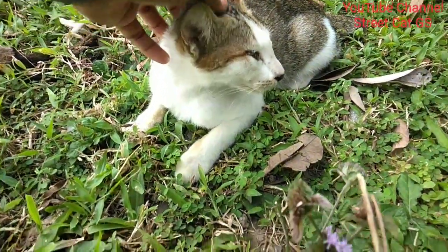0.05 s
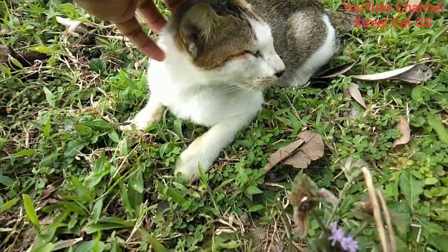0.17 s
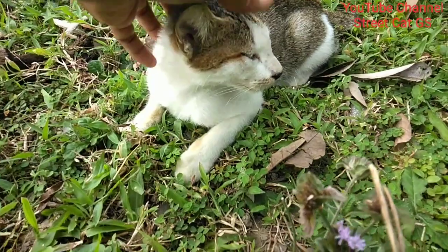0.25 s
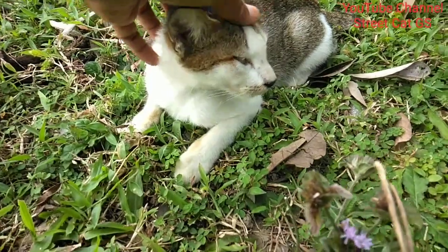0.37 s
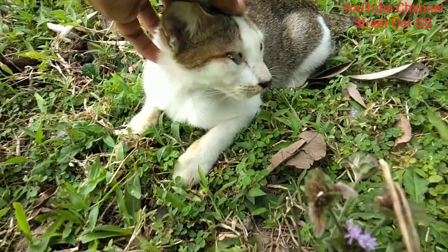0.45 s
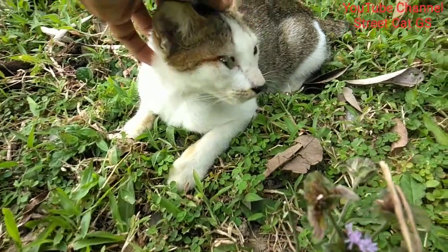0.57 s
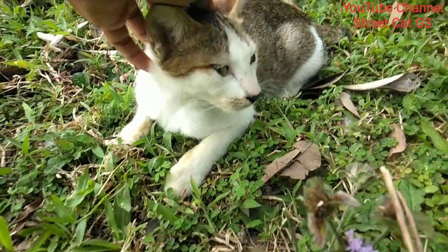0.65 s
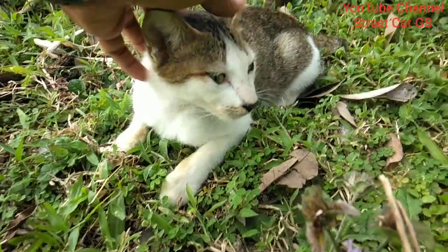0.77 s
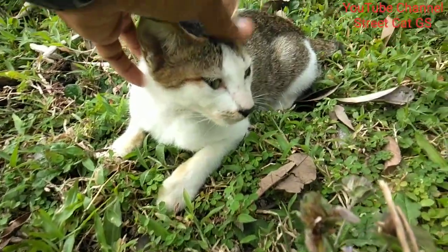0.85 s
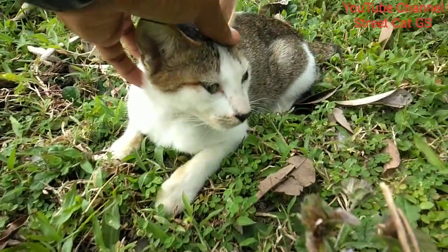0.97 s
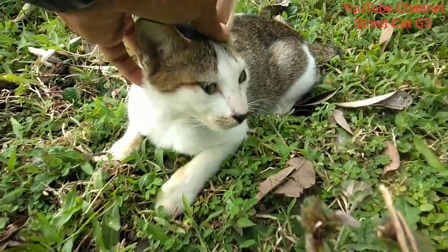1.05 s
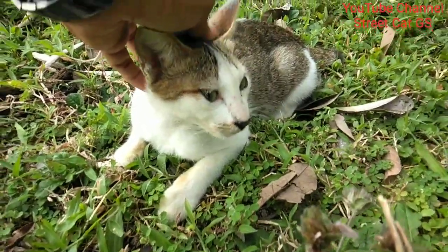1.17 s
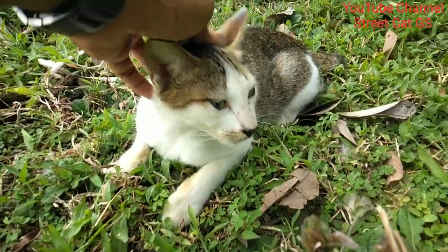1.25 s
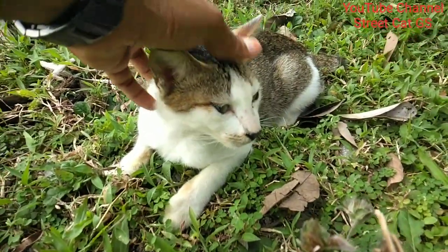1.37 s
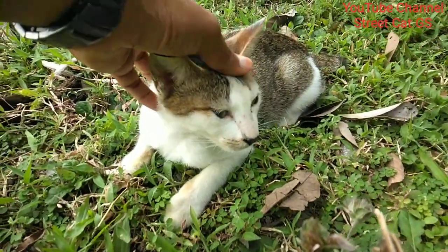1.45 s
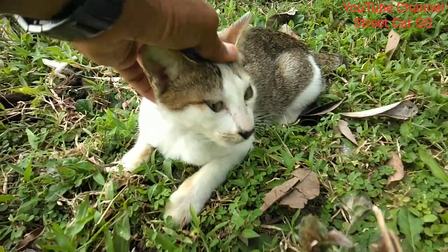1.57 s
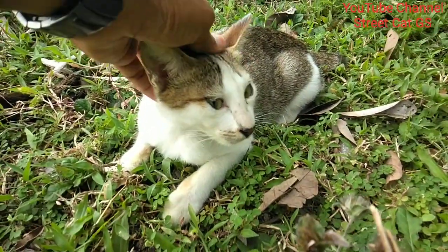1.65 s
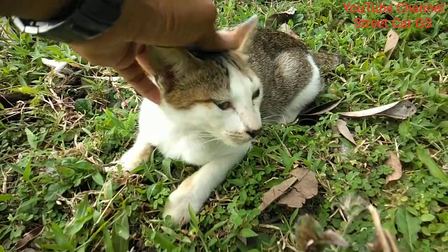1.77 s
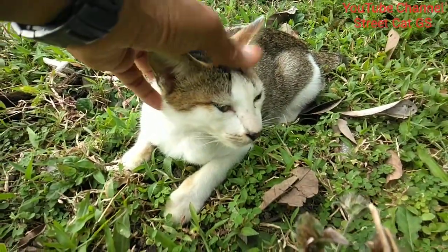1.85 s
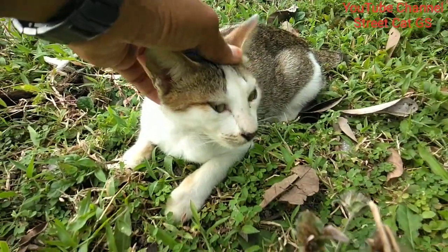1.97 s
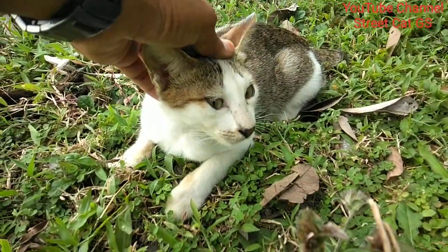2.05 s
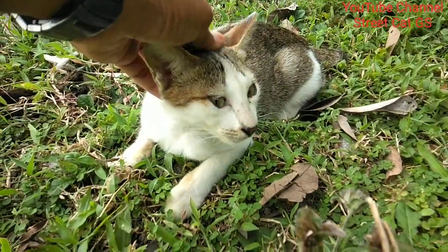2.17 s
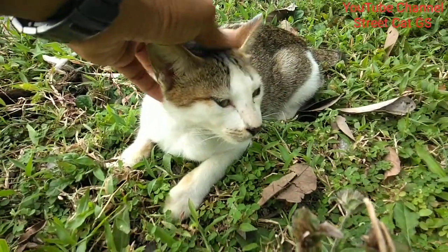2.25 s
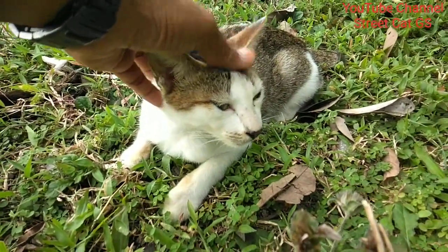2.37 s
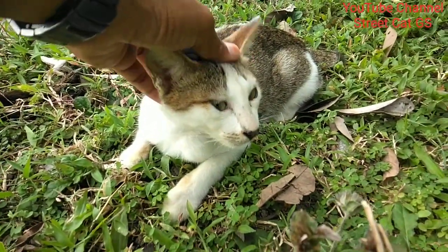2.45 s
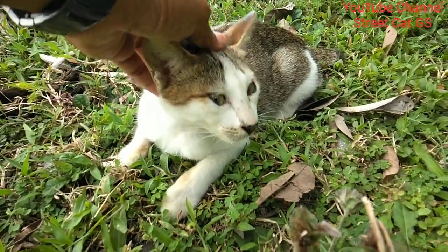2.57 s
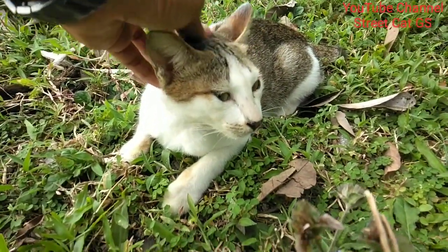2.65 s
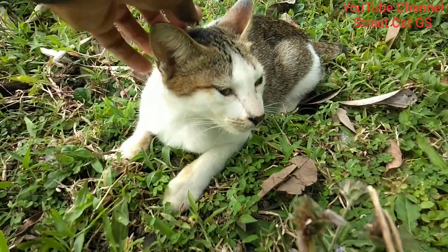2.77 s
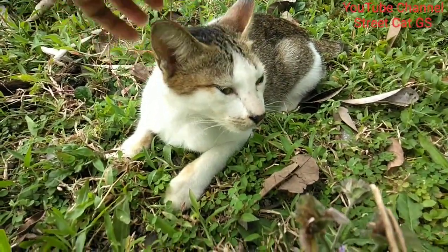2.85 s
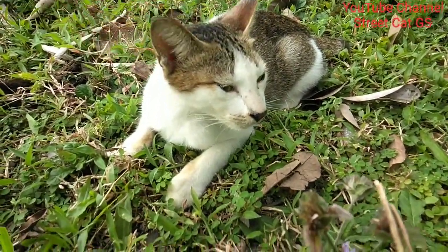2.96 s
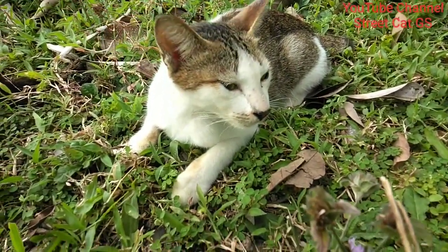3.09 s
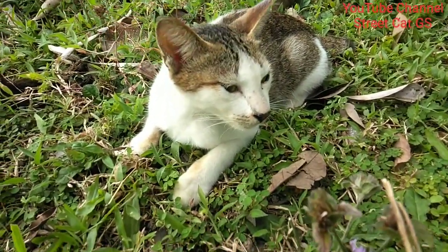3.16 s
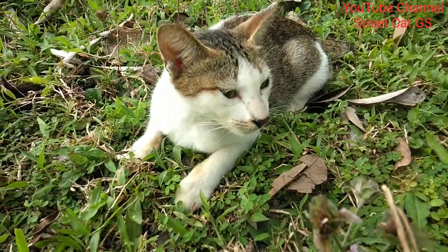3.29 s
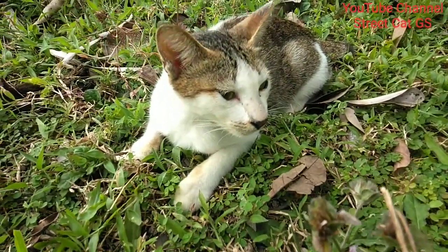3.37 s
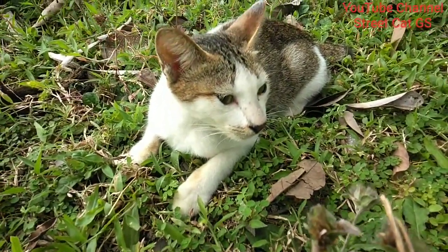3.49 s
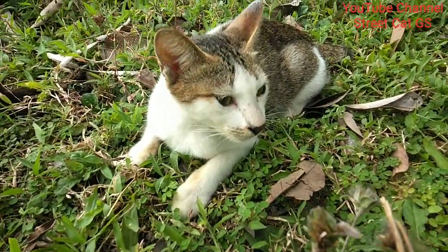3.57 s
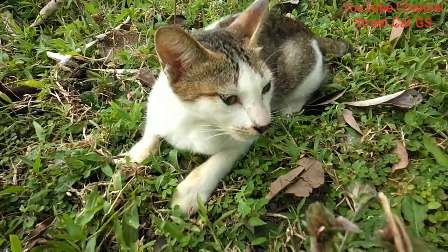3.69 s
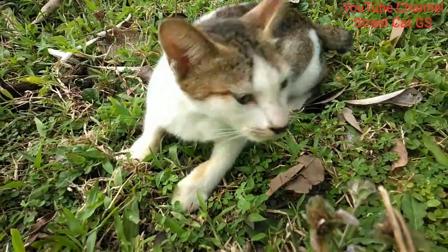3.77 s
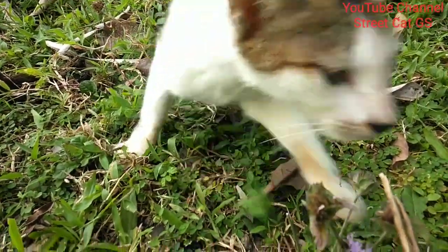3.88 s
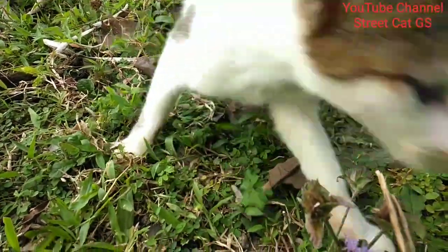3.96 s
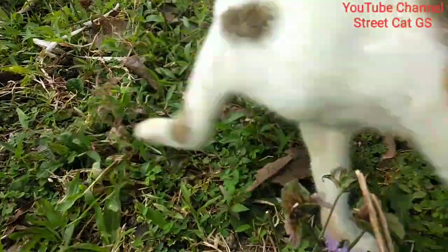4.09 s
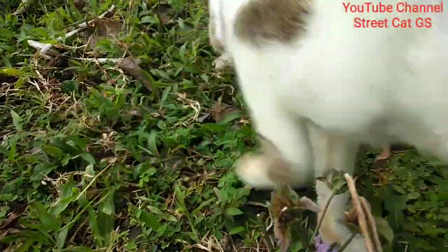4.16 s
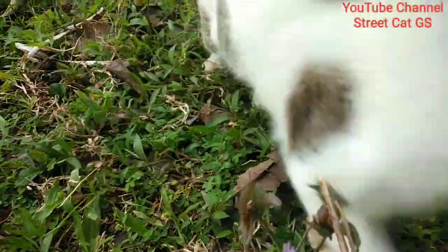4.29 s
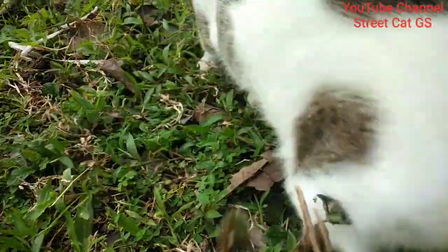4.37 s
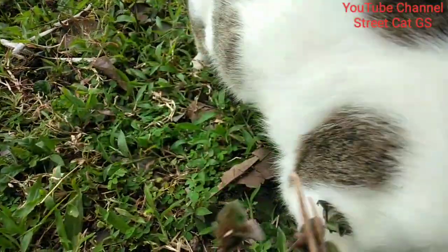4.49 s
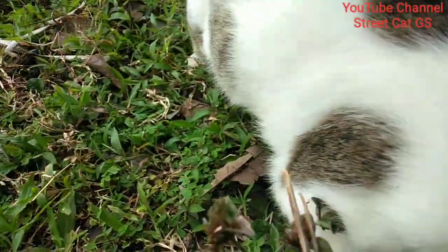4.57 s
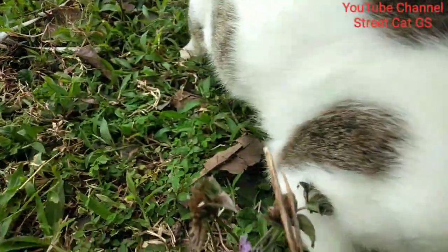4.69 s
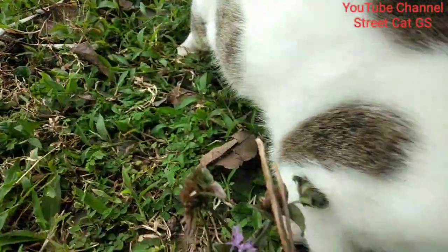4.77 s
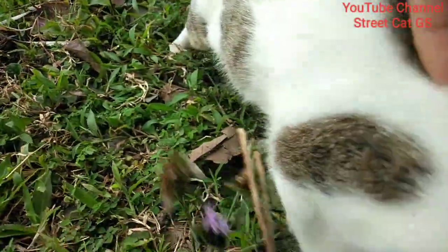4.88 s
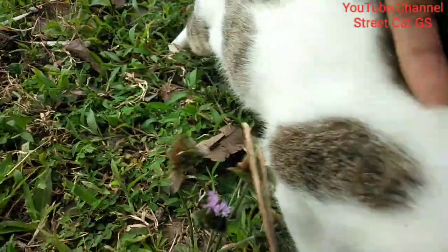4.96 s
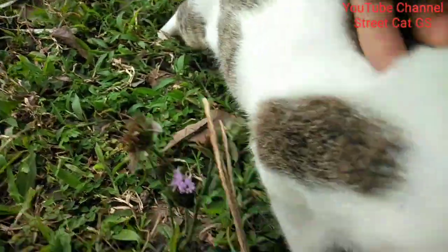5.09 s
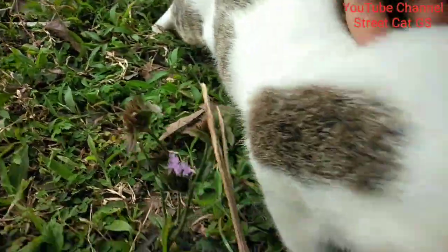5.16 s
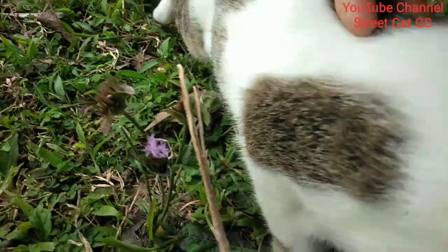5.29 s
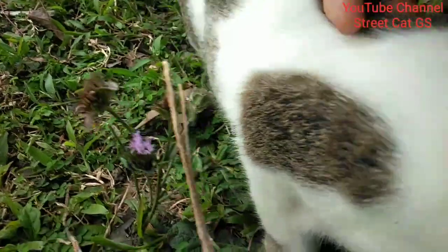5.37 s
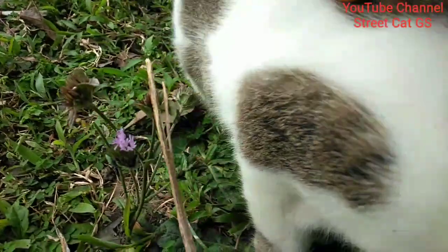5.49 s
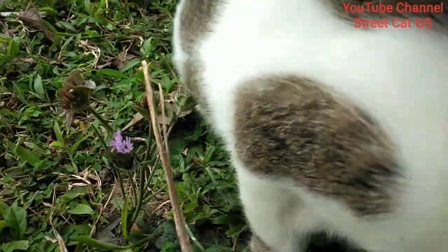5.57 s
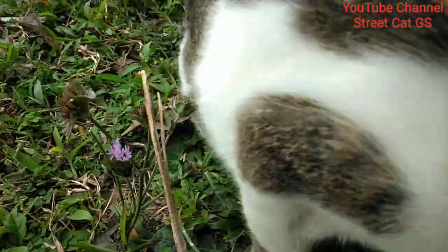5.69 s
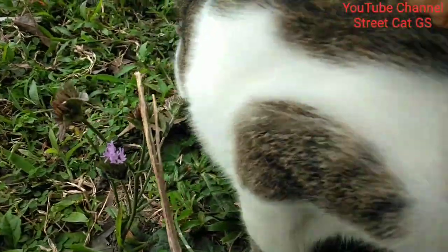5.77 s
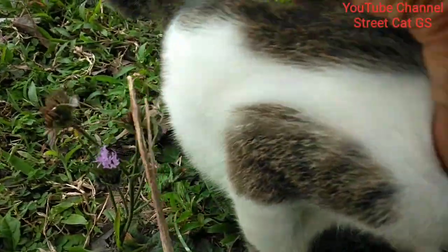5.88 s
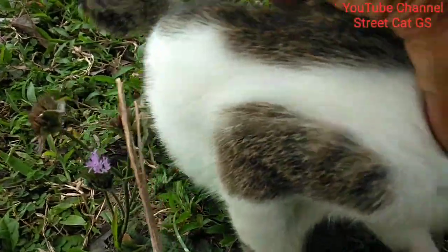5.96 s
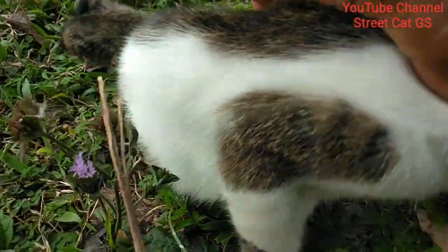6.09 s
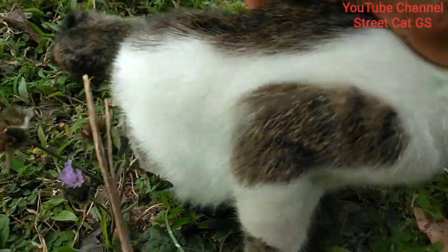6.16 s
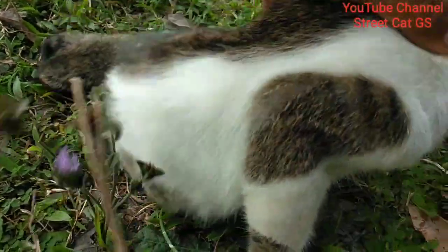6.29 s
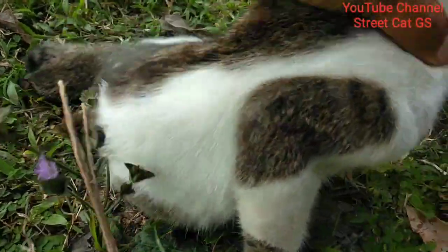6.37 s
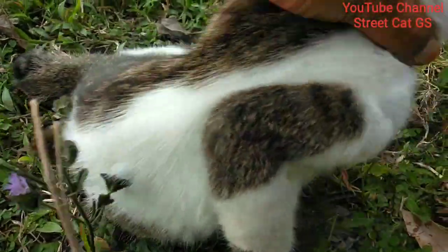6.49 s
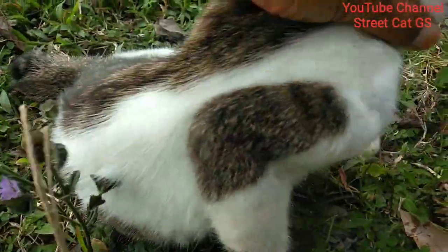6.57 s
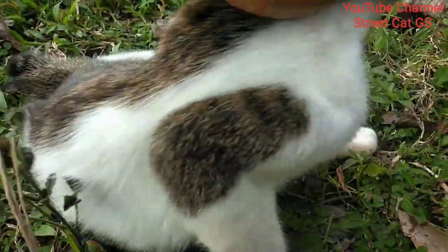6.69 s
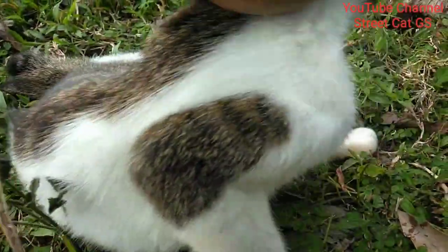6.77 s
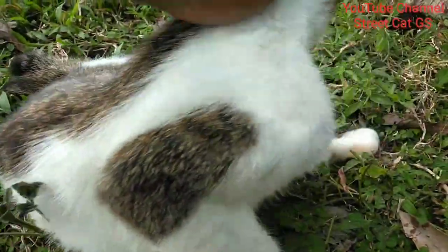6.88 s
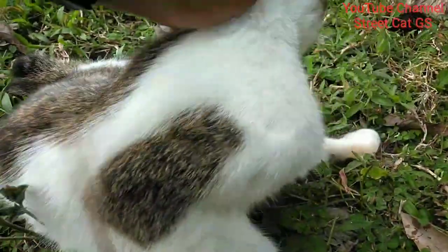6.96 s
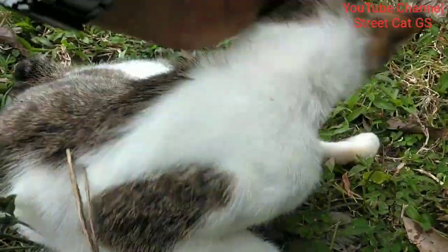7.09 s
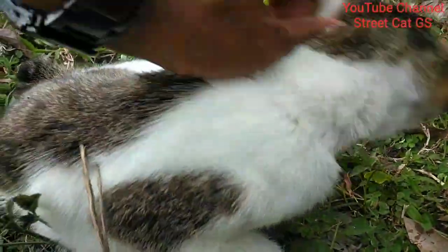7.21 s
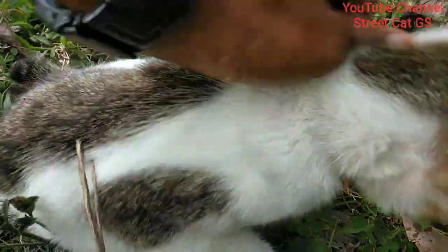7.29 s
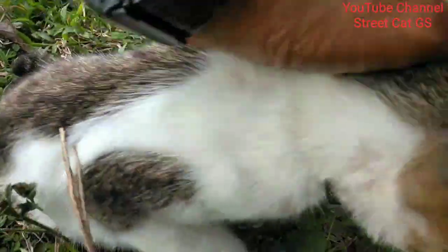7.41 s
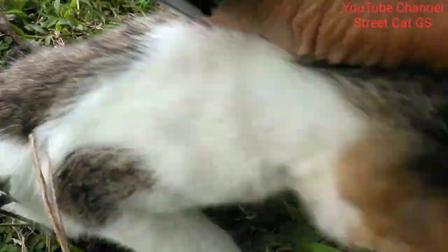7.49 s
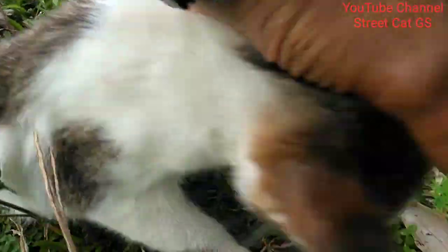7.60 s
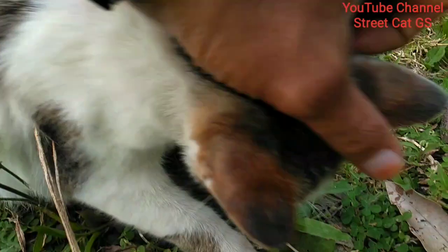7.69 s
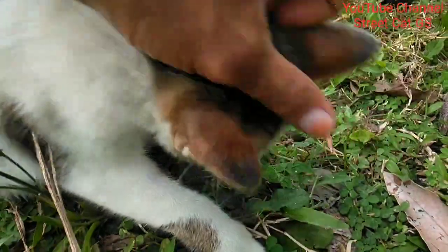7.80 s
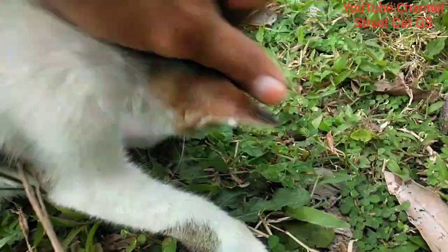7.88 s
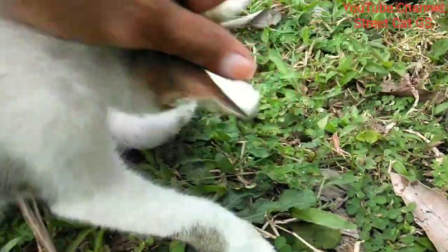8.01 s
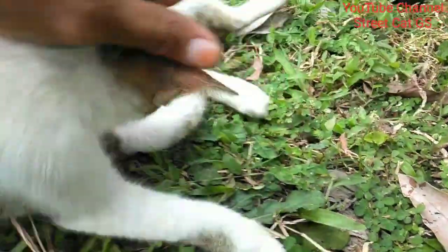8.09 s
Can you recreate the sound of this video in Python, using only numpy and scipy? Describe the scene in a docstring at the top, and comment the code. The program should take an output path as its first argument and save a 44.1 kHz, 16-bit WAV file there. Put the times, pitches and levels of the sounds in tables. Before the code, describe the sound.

Quiet lawn with fur being stroked, dry grass snaps and brief purr fragments close up, while a distant motorbike throbs, speeds up and passes.

```python
"""A cat is stroked on a lawn, gets up and rolls over close to the microphone: fur hisses as filtered friction
noise, grass crackles in ticks and short bursts, and the purr is puffed noise through throat resonances.
A low throb, most likely a motorbike some way off, slackens, gathers speed and passes: one pulse per firing.
Birds, whistled along pitch paths, call from the trees over a distant rumble, tyre noise and an even hiss;
a thin insect shrill (narrow noise) and one very high squeak (a sine through a resonance) lie on top."""
import sys
import numpy as np
from scipy import signal
from scipy.fft import rfft, irfft
from scipy.io import wavfile

SR = 44100
rng = np.random.default_rng(int(sys.argv[2]) if len(sys.argv) > 2 else 0)


def unload_audio(sound):
    """Save the sound as a 16-bit wav file, at the path given as the first command line argument."""
    columns = np.transpose(np.atleast_2d(sound))
    # keep every value between -1 and 1, then stretch to whole-number steps
    steps = np.round(np.clip(columns, -1, 1) * 32767)
    wavfile.write(sys.argv[1], SR, steps.astype(np.int16))


N = 358974
TIME = np.arange(N) / SR


def from_db(db):
    """Decibels to gain."""
    return 10 ** (np.asarray(db) / 20)


def rms_one(x):
    """Scale to rms 1."""
    return x / np.sqrt(np.mean(x ** 2) + 1e-20)


def in_time(rows):
    """One curve per column after t/s, joined by straight lines."""
    s, *columns = np.transpose(rows)
    return [np.interp(TIME, s, column) for column in columns]


def loudness(rows):
    """Gain curve from rows of (t/s, level/dB)."""
    return from_db(in_time(rows)[0])


def swells(rows, attack_s, release_s):
    """Gain of events (t/s, length/s, level/dB): smooth rise, hold, exponential decay; powers add."""
    power = 1e-16
    for s, length_s, db in rows:
        rise = np.sin(np.pi / 2 * np.clip((TIME - s) / attack_s, 0, 1)) ** 2
        fall = np.exp(-np.maximum(TIME - s - length_s, 0) / release_s)
        power = power + (from_db(db) * rise * fall) ** 2
    return np.sqrt(power)


def response(points, hz):
    """Gain of a (f/Hz, level/dB) spectrum at hz, interpolated over log frequency."""
    at_hz, db = np.transpose(points)
    return from_db(np.interp(np.log(hz + 1e-9), np.log(at_hz), db))


def coloured(x, points):
    """Give a signal a spectrum that falls away outside its ends; rms 1."""
    hz = np.arange(N // 2 + 1) * SR / N
    low_skirt = np.minimum(hz / points[0][0], 1) ** 2
    high_skirt = 1 / np.maximum(hz / points[-1][0], 1) ** 2
    return rms_one(irfft(rfft(x) * response(points, hz) * low_skirt * high_skirt, N))


def noise():
    """White noise, rms near 1."""
    return rng.standard_normal(N)


def drift(knots_per_s):
    """Slow random curve, straight between knots; rms 1."""
    knots = rng.standard_normal(8192)
    return rms_one(np.interp(TIME * knots_per_s, np.arange(len(knots)), knots))


def grains(spread_db):
    """Friction: tiny slips of very unequal size, 16 samples each; rms 1."""
    size_db = spread_db * np.repeat(noise(), repeats=16)[:N]
    return rms_one(noise() * from_db(size_db))


def resonate(x, hz, width_hz):
    """Two-pole resonance with gain 1 on top."""
    r = np.exp(-np.pi * width_hz / SR)
    zeros = np.array([1, 0, -1]) * (1 - r * r) / 2
    poles = [1, -2 * r * np.cos(2 * np.pi * hz / SR), r * r]
    return signal.lfilter(zeros, poles, x + 1e-18)


def fur(resting_hand_db=-74.5, catch_db=2):
    """Hairs slip and catch under the hand, faintly at rest, louder in each hiss; one quick brush crosses the ear."""
    # hisses: strokes along the fur, and at 6.085 s the rustle that trails a grass snap:
    # t/s, length/s, level/dB
    hiss_rows = [(.54, 0.069, -62.5), (1.35, 0.038, -64), (2.92, 0.51, -66.5), (2.94, 0.14, -65),
                 (3.75, .38, -67.5), (4.85, .11, -68.5), (5.22, 0.21, -60.5), (6.085, 0.066, -58.5),
                 (6.7, .46, -66), (7.62, 0.51, -59.5), (7.7, 0.14, -63)]
    # brush over the ear: t/s, length/s, level/dB
    brush_rows = [(.628, 0.046, -50.5)]
    # colour of sliding fur: f/Hz, relative level per Hz/dB
    fur_colour = [(1800, 5), (4400, -0.5), (5200, -3.5), (6800, 10.5), (8000, 2.5), (9500, -2), (11500, -5),
                  (13700, 5.5), (15700, -1)]
    # colour of the brush over the ear: f/Hz, relative level per Hz/dB
    swish_colour = [(410, -7), (700, -5.5), (946, -7), (1170, -2.5), (1580, -8.5), (2700, 0.5),
                    (4730, -10.5), (6830, -1), (10400, -15), (16000, -5.5)]
    slips = grains(spread_db=3.5)
    hisses = swells(hiss_rows, attack_s=0.014, release_s=0.026) * from_db(catch_db * drift(45))
    sliding = np.hypot(from_db(resting_hand_db), hisses) * coloured(slips, fur_colour)
    brush = swells(brush_rows, attack_s=0.021, release_s=0.08) * coloured(slips, swish_colour)
    return sliding + brush


def rub(s=-0.075, length_s=0.46, db=-70, hz=2200, width_hz=700):
    """Fingers rub behind the ear: a duller hiss, noise through one resonance."""
    hiss = rms_one(resonate(noise(), hz, width_hz))
    return swells([(s, length_s, db)], attack_s=0.35, release_s=0.16) * hiss


def throttle():
    """Gain and brightness (dB per octave) of the exhaust as the rider opens and eases off."""
    # throttle openings: t/s, length/s, level/dB, brightness/(dB per octave)
    pull_rows = [(-.2, 1.2, -53.5, -15), (1.666, .65, -54.5, 4), (2.978, 5.3, -49.5, -3.5)]
    pulls = [swells([row[:3]], attack_s=0.36, release_s=0.32) for row in pull_rows]
    tilts = [row[3] for row in pull_rows] * np.ones((N, 1))
    return sum(pulls), np.average(tilts, axis=1, weights=np.transpose(pulls))


def multiples(orders, firing_hz, centre_hz, width_hz, flutter_rad=0.46):
    """Multiples of the firing rate around a moving centre; phases flutter on their way through the air."""
    phase = 2 * np.pi * np.cumsum(firing_hz) / SR
    total = 0
    for k in orders:
        gain = 1 / (1 + (2 * (k * firing_hz - centre_hz) / width_hz) ** 4)
        total = total + gain * np.cos(k * phase + rng.uniform(0, 2 * np.pi) + flutter_rad * drift(25))
    return rms_one(total)


def engine(uneven_db=1.0, gate_depth=0.22, rasp_width_hz=400, puff_db=-4.0, ring_db=-4.0,
           growl_db=-9, growl_ratio=0.542, growl_width_hz=200, growl_fall_power=7, count=16):
    """One exhaust pulse per firing: silencer thud, a rasp that brightens on approach, a growl when nearest."""
    # engine speed: t/s, firing rate/Hz
    speed = [(0, 59), (1.65, 58.5), (2.06, 54.2), (2.65, 53.5), (3.18, 55.5), (4.25, 59.6), (4.52, 61),
             (6, 66), (7.04, 67.7), (8.14, 67.6)]
    # silencer response: f/Hz, gain/dB
    silencer = [(55, -19.5), (68, -11.5), (105, -3.2), (135, 3), (170, 7), (203, 3), (225, 9), (245, -3.5),
                (270, 2.5), (320, -25), (500, -10), (700, -18)]
    # rasp carries only while the bike is in the open: t/s, length/s, level/dB
    rasp_rows = [(2.8, 4.45, -62)]
    nearest_s, distance_m, bike_m_per_s = 5.44, 34.5, 13.6
    cruise_hz, rev_db_per_octave = 59.9, 16.5
    rasp_top_hz, rasp_fall_power = 1470, 0.86

    firing_hz, = in_time(speed)
    turns = np.cumsum(firing_hz) / SR
    phase = 2 * np.pi * turns
    # straight path past the lawn
    nearness = distance_m / np.hypot(distance_m, bike_m_per_s * (TIME - nearest_s))
    # no two firings are equally strong
    strength = from_db(uneven_db * np.interp(turns, np.arange(SR), rng.standard_normal(SR)))
    effort, tilt_db = throttle()
    # a faster engine is louder
    throb = effort * nearness * from_db(rev_db_per_octave * np.log2(firing_hz / cruise_hz))

    # exhaust valve open for a fifth of each cycle: every fifth multiple cancels
    open_share = .2
    thud = 0
    for k in range(1, count):
        # brightness tilt pivots on multiple 2 and levels off from 4
        tilt = from_db(tilt_db * np.log2(min(k / 2, 2)))
        gain = np.sinc(k * open_share) * response(silencer, k * firing_hz) * tilt
        thud = thud - np.sqrt(2) * gain * np.cos(k * phase + np.pi / 3)

    # rasp: part ringing metal, part a puff of gas per firing in the same band
    centre_hz = rasp_top_hz * nearness ** rasp_fall_power
    ring = multiples(range(count - 2, 2 * count), firing_hz, centre_hz, rasp_width_hz)
    carrier = np.exp(2j * np.pi * np.cumsum(centre_hz) / SR)
    band = signal.butter(2, rasp_width_hz / 2, fs=SR, output="sos")
    gated = noise() * (1 + gate_depth * np.cos(phase))
    puffs = rms_one(np.real(carrier * signal.sosfilt(band, gated / carrier)))
    # growl: a few multiples about an octave lower
    growl = multiples(range(count // 2, count), firing_hz, growl_ratio * centre_hz, growl_width_hz)
    rasp = from_db(ring_db) * ring + from_db(puff_db) * puffs
    rasp = rasp + from_db(growl_db) * nearness ** growl_fall_power * growl
    heard = swells(rasp_rows, attack_s=2.67, release_s=0.56)
    return strength * (throb * thud + heard * rasp)


def outdoors(air_db=-65.0, swell_db=0.5):
    """Far rumble, tyres on the road that swell as the bike comes up, and an even hiss: coloured noises."""
    # distant rumble: t/s, level/dB
    rumble_levels = [(0, -56), (.8, -55), (2, -56.5), (2.7, -54.5), (8.14, -52.5)]
    # colour of the rumble: f/Hz, relative level per Hz/dB
    rumble_colour = [(20, -9.5), (40, -2), (65, 1.5), (90, -2), (120, 4), (180, -3), (230, -8),
                     (300, -22.5), (500, -22)]
    # tyre noise: t/s, length/s, level/dB
    tyre_rows = [(2.9, 4.5, -64.5)]
    # colour of tyres on the road: f/Hz, relative level per Hz/dB
    road_colour = [(250, 2), (520, 3), (850, -7), (1900, -4), (3000, -10.5), (9000, -17)]
    # colour of the open-air hiss: f/Hz, relative level per Hz/dB
    air_colour = [(250, 7), (500, -5.5), (800, -1.5), (2200, -1.5), (3200, -5), (5200, -8.5), (6700, -4.5),
                  (7500, -7), (8150, -1), (8700, -12.5), (12500, -12.5), (15500, -6)]
    rumble = loudness(rumble_levels) * coloured(noise(), rumble_colour) * from_db(swell_db * drift(10))
    tyres = swells(tyre_rows, attack_s=2.27, release_s=0.56) * coloured(noise(), road_colour)
    return rumble + tyres + from_db(air_db) * coloured(noise(), air_colour)


def insects(start_db=-78, fade_db_per_s=1.0, hz=4430, width_hz=120):
    """A thin shrill from the grass, narrow-band noise, that wavers and slowly fades."""
    gain = from_db(start_db - fade_db_per_s * TIME + 2 * drift(4.7))
    return gain * rms_one(resonate(noise(), hz, width_hz))


def trees(x, t60_s, wet_db, stir_per_s=400):
    """Trunks and stirring leaves scatter a far sound into a short, diffuse tail."""
    tail = rng.standard_normal(SR) * from_db(-60 * TIME[:SR] / t60_s)
    scattered = signal.fftconvolve(x, tail / np.linalg.norm(tail))[:N]
    return x + from_db(wet_db) * scattered * drift(stir_per_s)


def whistle(path, start_s=0, ratio=1):
    """A near sine that follows a pitch path."""
    s, hz, db = np.transpose(path)
    age_s = np.arange(s[0], s[-1], 1 / SR)
    phase = 2 * np.pi * ratio * np.cumsum(np.interp(age_s, s, hz)) / SR
    tone = np.sqrt(2) * from_db(np.interp(age_s, s, db)) * np.sin(phase)
    out, at = np.zeros(N), round((start_s + s[0]) * SR)
    out[at:at + len(tone)] = tone * signal.windows.tukey(len(tone), .1)
    return out


def birds(level_db=-7.5, flock_db=-3.0, count=300):
    """Hoarse calls broken up by the trees, and a farther flock whose overlapping slurs blur into a twitter."""
    # pitch paths of the calls: t from call start/s, f before pitch ratio/Hz, relative level/dB
    chirp_path = [(0, 2350, -12), (.013, 2480, -1), (.033, 3250, -4), (.046, 2400, 2), (.062, 1850, -10)]
    slur_path = [(0, 6310, -7.5), (.025, 5480, 7.5), (.055, 4292, 6), (.09, 3850, 4.5), (.15, 3494, 5.5)]
    pip_path = [(0, 3690, -7), (.015, 3475, 6), (.04, 3550, -9)]
    # chirp, falling slurs, short pips: t/s, relative level/dB, pitch ratio
    chirp_rows = [(1.981, -51.5, 0.97)]
    slur_rows = [(2.345, -71.5, 1.06), (3.305, -75, 1.03), (3.685, -70, 1.0)]
    pip_rows = [(3.8, -65, 1.08), (4.81, -61.5, 1.04)]
    # twittering flock: t/s, relative level/dB
    flock_levels = [(.7, -77.5), (1.5, -71), (2.4, -68), (3.1, -73.5), (5.5, -75.5)]
    calls = np.zeros(N)
    for path, rows in ((chirp_path, chirp_rows), (slur_path, slur_rows), (pip_path, pip_rows)):
        for s, db, ratio in rows:
            calls += from_db(db) * whistle(path, s, ratio)
    hoarse = calls * from_db(2 * drift(90)) * (1 + .7 * drift(700))
    near = trees(hoarse, t60_s=.5, wet_db=0, stir_per_s=900)
    starts_s = np.linspace(.3, 5.5, count) + rng.uniform(0, .1, count)
    ratios = rng.uniform(.95, 1.3, count)
    flock = sum(whistle(slur_path, s, ratio) for s, ratio in zip(starts_s, ratios))
    far = rms_one(trees(flock * drift(500), t60_s=.3, wet_db=6))
    return from_db(level_db) * near + from_db(flock_db) * loudness(flock_levels) * far


def taps(scuff=.25, scuff_s=.003):
    """Soft paws and fingers: a padded contact and a brief scuff set a well-damped resonance going."""
    # taps: t/s, peak/dB, f/Hz, nominal width/Hz
    tap_rows = [(.634, -55, 380, 250), (0.695, -52.5, 1200, 200), (.730, -51, 1090, 300),
                (2.592, -52, 1100, 350), (2.592, -49.5, 2480, 1200), (4.58, -42, 970, 520),
                (4.654, -48, 650, 500), (4.675, -43.5, 1060, 550), (4.686, -42, 646, 550),
                (7.555, -45, 1900, 600)]
    out, age_s = np.zeros(N), TIME[:SR // 10]
    for s, db, hz, width_hz in tap_rows:
        push = (age_s == 0) + scuff * rng.standard_normal(len(age_s)) * np.exp(-age_s / scuff_s)
        push = signal.sosfilt(signal.butter(4, hz + width_hz, fs=SR, output="sos"), push)
        knock = resonate(resonate(push, hz, 2 * width_hz), hz, 2 * width_hz)
        at = round(s * SR)
        out[at:at + len(age_s)] += from_db(db) * knock / np.abs(knock).max()
    return out


def pat(hz=160, rise_s=0.0061, fall_s=0.0045):
    """The hand lands on the head: a dull bump of a few cycles under a bell-shaped envelope."""
    # the one pat: t/s, peak/dB
    pat_event = (.6405, -35.5)
    s, db = pat_event
    age_s = TIME - s
    envelope = np.exp(-(age_s / np.where(age_s < 0, rise_s, fall_s)) ** 2)
    return -from_db(db) * np.cos(2 * np.pi * hz * age_s) * envelope


def grass(level_db=-5.0, burst_s=0.0049, tail_db=-24, tail_s=0.074, crack_db=-3, crack_width_hz=1100):
    """Each snap of a dry stalk is a short burst of breaking fibres with its own pitch; then the blade settles."""
    # snaps: t/s, relative level/dB, treble relative to dull part/dB, crack f/Hz
    snap_rows = [(1.802, -59, 9, 14500), (4.149, -52, 6, 7000), (4.687, -40.5, 2.5, 6500),
                 (4.703, -38.5, 0, 5070), (4.986, -49, -12, 2880), (5.282, -46, -1, 7000),
                 (6.071, -38.5, -15, 4500), (6.08, -38.5, -5, 5360), (6.091, -37.5, -1, 6460),
                 (6.147, -51, 1, 6800), (6.174, -50, -8, 4300), (6.242, -41, 6, 2900),
                 (6.247, -42, 7, 7150), (6.27, -46, 6, 14500), (8.12, -57, 7, 14500)]
    # colour of snapping stalks: f/Hz, relative level per Hz/dB
    stalk_colour = [(1200, -6), (3000, -12), (4400, 2), (5200, -7), (6500, 14.5), (8000, 5.5), (11000, 7.5),
                    (14000, 12), (15500, 8)]
    fibres = coloured(grains(spread_db=3), stalk_colour)
    dull = rms_one(signal.sosfilt(signal.butter(2, 9000, fs=SR, output="sos"), fibres))
    bright = rms_one(signal.sosfilt(signal.butter(2, 12500, "high", fs=SR, output="sos"), fibres))
    out, age_s = np.zeros(N + SR), TIME[:SR // 2]
    rise = 1 - np.exp(-age_s / .0012)
    envelope = rise * (np.exp(-age_s / burst_s) + from_db(tail_db) * np.exp(-age_s / tail_s))
    for s, db, treble_db, hz in snap_rows:
        span = round(s * SR) + np.arange(len(age_s))
        crack = rms_one(resonate(rng.standard_normal(len(age_s)), hz, crack_width_hz))
        burst = dull[span % N] + from_db(treble_db) * bright[span % N] + from_db(crack_db) * crack
        out[span] += from_db(db + level_db) * burst * envelope
    return out[:N]


def squeak(db=-56, ring_hz=14070, ring_width_hz=230):
    """A thin, very high squeak wavers and sinks, and flares each time it crosses its resonance."""
    # pitch path: t/s, f/Hz
    squeak_path = [(3.285, 13700), (3.315, 14580), (3.39, 14580), (3.44, 13500), (3.462, 13450),
                   (3.487, 14120), (3.52, 13200), (3.615, 13930), (3.645, 13300)]
    pitch_hz, = in_time(squeak_path)
    sounding = (TIME > squeak_path[0][0]) & (TIME < squeak_path[-1][0])
    tone = sounding * np.sin(2 * np.pi * np.cumsum(pitch_hz) / SR)
    return from_db(db) * resonate(tone, ring_hz, ring_width_hz)


def crackle(ticks_per_s=300, spread_db=5, hz=14800, width_hz=2500):
    """Blades rub past each other in tiny, bright ticks as the cat shifts its weight."""
    # shifts of weight: t/s, length/s, level/dB
    shift_rows = [(3.95, 0.18, -68.5), (4.25, .65, -73), (5.22, .48, -74), (6.06, 0.25, -63),
                  (6.45, 0.33, -71), (7, 0.2, -72), (7.55, .65, -71)]
    ticks = (rng.random(N) < ticks_per_s / SR) * from_db(spread_db * np.clip(noise(), -2, 2))
    # each tick is a short decaying burst of noise
    slips = signal.lfilter([1], [1, -.96], ticks + 1e-18) * noise()
    return swells(shift_rows, attack_s=0.035, release_s=0.096) * rms_one(resonate(slips, hz, width_hz))


def purr(jitter=.03, uneven_db=1.2, open_share=.19):
    """The larynx lets slow, unequal puffs of air into throat and nose; each bout starts with a puff."""
    # bouts close enough to hear: t/s, length/s, level/dB, mean puff rate/Hz
    purr_rows = [(5.128, .055, -56.5, 27), (5.2, .23, -63, 29.5), (6.725, .2, -63.5, 28.6),
                 (7.312, .13, -63.5, 28.3), (7.62, .09, -64.5, 30), (7.724, .15, -59.5, 32)]
    # resonances of throat and nose, each applied twice: f/Hz, width per pass/Hz, gain/dB
    throat = [(450, 200, -1), (590, 150, -2), (1050, 300, -13), (4380, 400, -17)]
    flow, wander = 0, jitter * drift(25)
    for s, length_s, db, puffs_per_s in purr_rows:
        cycle = np.cumsum(puffs_per_s * (1 + wander) * (TIME > s)) / SR % 1
        opening = cycle / open_share
        puff = 2 * opening * np.exp(1 - opening) * np.exp(-opening ** 2 / 20)
        flow = flow + swells([(s, length_s, db)], attack_s=0.016, release_s=0.011) * puff
    air = noise()
    voiced = sum(from_db(db) * resonate(resonate(air, hz, width_hz), hz, width_hz)
                 for hz, width_hz, db in throat)
    return flow * from_db(uneven_db * drift(30)) * rms_one(voiced)


def scene():
    """Everything reaches one microphone."""
    cat = fur() + rub() + taps() + pat() + grass() + crackle() + purr()
    return (cat + engine() + outdoors() + insects() + birds() + squeak())[None]


def record(dry, cutoff_hz=15900):
    """The top is cut steeply."""
    return signal.sosfilt(signal.ellip(12, .1, 70, cutoff_hz, fs=SR, output="sos"), dry)


dry = scene()
out = record(dry)
unload_audio(out)
```